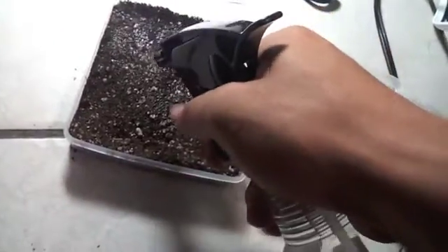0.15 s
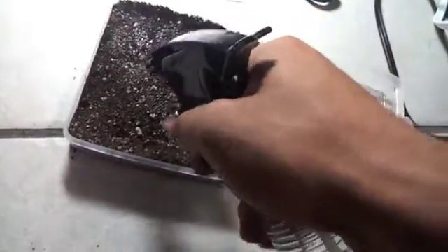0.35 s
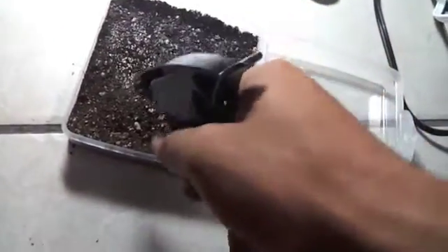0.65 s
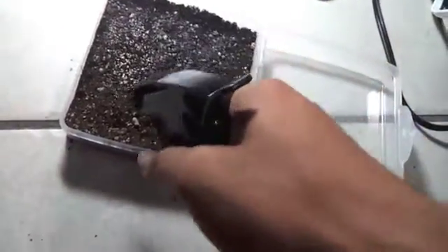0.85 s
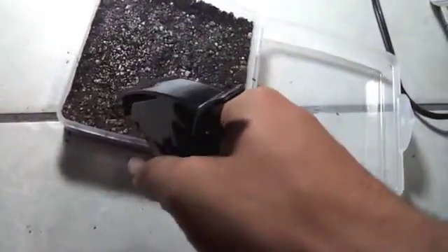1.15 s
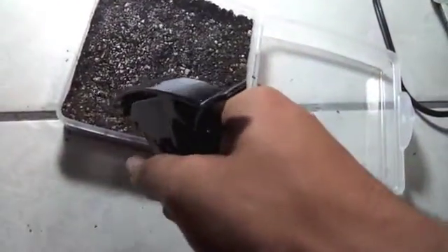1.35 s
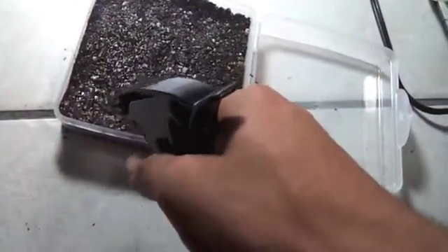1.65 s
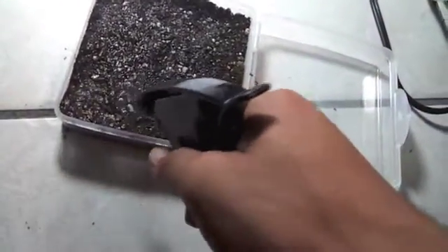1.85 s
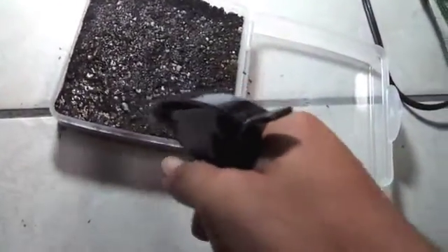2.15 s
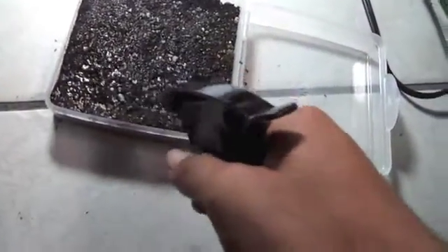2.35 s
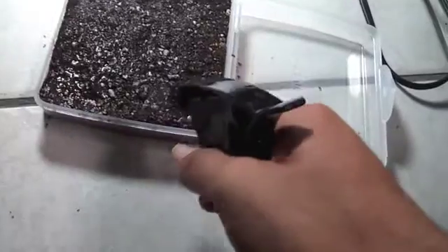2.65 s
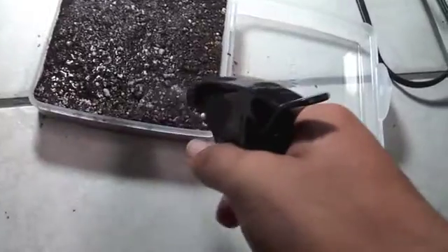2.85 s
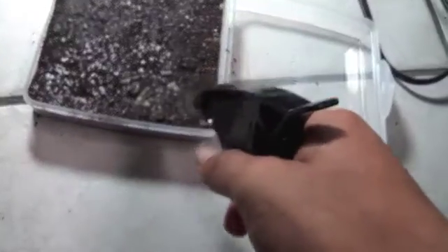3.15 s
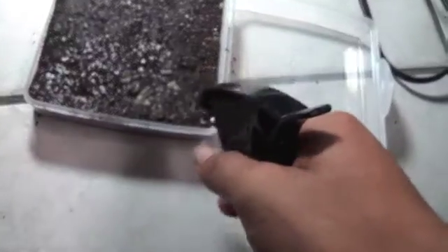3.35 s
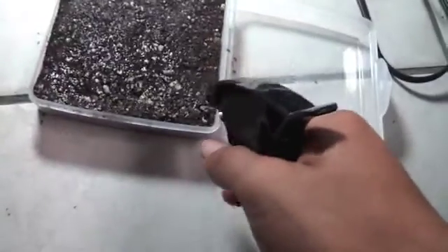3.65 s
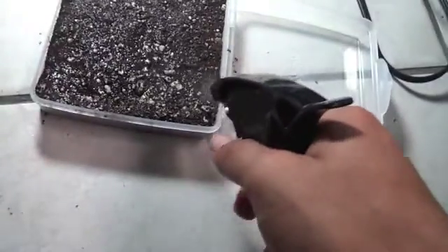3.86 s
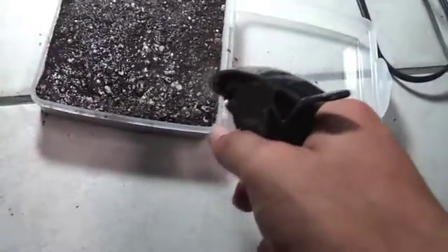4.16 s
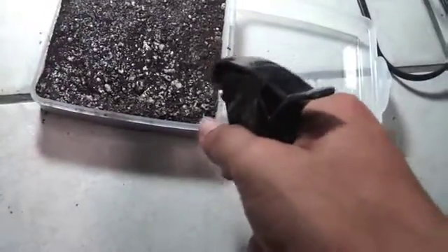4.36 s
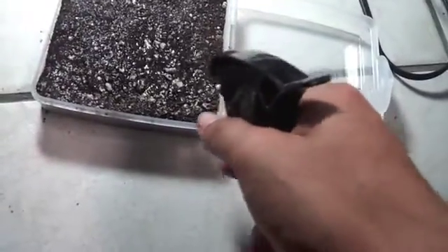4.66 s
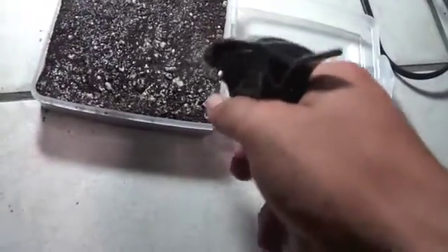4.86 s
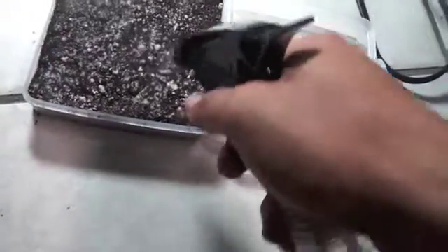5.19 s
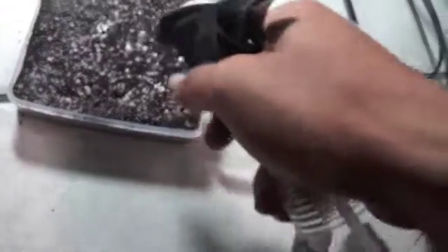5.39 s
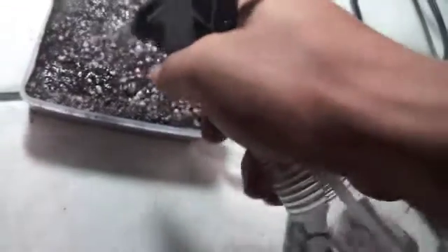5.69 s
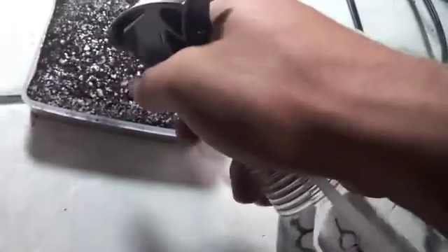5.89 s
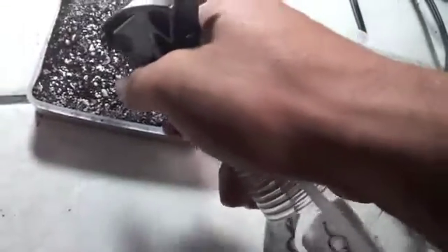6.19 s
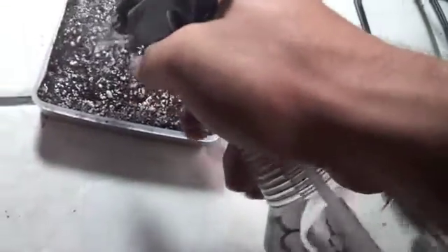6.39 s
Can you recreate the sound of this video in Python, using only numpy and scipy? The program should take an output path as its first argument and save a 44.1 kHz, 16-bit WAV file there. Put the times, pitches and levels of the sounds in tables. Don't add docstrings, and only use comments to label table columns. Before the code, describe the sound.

Close up in a small room, a hand pumps a plastic trigger spray bottle about three times a second. Each squeeze begins with a sharp, juddering plastic crack, then a short airy hiss of mist swells and fades. On release, small ticks and a faint sucking whistle follow. Low room noise and a weak hum lie underneath; the loudest clicks sound slightly overloaded.

```python
import sys
import numpy as np
from scipy import signal
from scipy.io import wavfile

SR = 44100
rng = np.random.default_rng(int(sys.argv[2]) if len(sys.argv) > 2 else 0)


def boost(x):
    u = np.asarray(x, float) / 20
    return 10 ** u


def master_out(mix):
    frames = np.transpose(np.atleast_2d(mix))
    ceiling = np.clip(frames, -1, 1)
    pcm = np.round(ceiling * 32767).astype(np.int16)
    wavfile.write(sys.argv[1], SR, pcm)


N = 287973

# f/Hz, bandwidth/Hz, level/dB
SHELL_MODES = [(2285, 400, -7), (2720, 210, -8), (3153, 260, -2.5), (3556, 405, -1.5), (4085, 530, -1),
               (4810, 415, -1.5), (5350, 565, 2), (5960, 580, 3), (6314, 700, 0)]
# f/Hz, bandwidth/Hz, level/dB
HEAD_MODES = [(813, 84, -2), (992, 118, 0.5), (1234, 89, -2), (1650, 320, -7)]
# f/Hz, bandwidth/Hz, level/dB
BOTTLE_MODES = [(234.7, 59.5, -2), (348, 72, 0), (510, 420, -13.5)]
# f/Hz, bandwidth/Hz, level/dB
INLET_MODES = [(1970, 330, -8), (2360, 210, -3), (2670, 190, -10.5)]
# t/s, peak level/dB, brightness/dB
FIRST_SLIPS = [(0.21, -8, -5), (0.5001, -10, -7), (0.7676, -12, -4), (1.0721, -14, -1), (1.3562, -14, 2),
               (1.615, -16, -1), (1.9145, -18, -2), (2.2385, -15, -3), (2.5318, -18, 0), (2.8538, -18, -6),
               (3.1885, -14, 4), (3.5446, -7, -3), (3.8923, -15, 0), (4.199, -21, 3), (4.5634, -7, -2),
               (4.9423, -16, 1), (5.3208, -11, -3), (5.6972, -8, -2), (6.0708, -14, -2), (6.4481, -12, -3)]
# start t/s, stop t/s, level/dB
INTAKES = [(0.116, 0.144, -66), (0.417, 0.45, -53), (0.706, 0.74, -52), (0.976, 1.03, -55),
           (1.287, 1.323, -52), (1.565, 1.589, -45), (1.85, 1.895, -53), (2.14, 2.201, -50),
           (2.465, 2.512, -54.5), (2.766, 2.808, -51), (3.094, 3.15, -38), (3.449, 3.475, -48),
           (3.793, 3.842, -51), (4.135, 4.19, -51), (4.47, 4.539, -54), (4.814, 4.911, -57),
           (5.196, 5.292, -52), (5.606, 5.64, -44.5), (5.937, 6.003, -47.5), (6.342, 6.395, -44)]


def rms_one(x):
    return x / np.sqrt(np.mean(x ** 2) + 1e-20)


def drift(rate):
    r = np.exp(-2 * np.pi * rate / SR)
    noise = rng.standard_normal(N + 9000)
    return rms_one(signal.lfilter([1], [1, -2 * r, r * r], noise)[9000:])


def resonance(x, hz, width_hz):
    r = np.exp(-np.pi * width_hz / SR)
    zeros = np.array([1, 0, -1]) * (1 - r * r) / 2
    poles = [1, -2 * r * np.cos(2 * np.pi * hz / SR), r * r]
    return signal.lfilter(zeros, poles, x)


def grains(per_s, spread_db):
    sizes = boost(spread_db * np.minimum(rng.exponential(1, N), 5)) * rng.choice([-1, 1], N)
    return rms_one(sizes * (rng.random(N) < per_s / SR))


def hiss(modes, drive, patchy_db, rate):
    total = np.zeros(N)
    for k, (hz, width, db) in enumerate(modes):
        flicker = boost(db + patchy_db * drift(rate))
        total += (-1) ** k * flicker * resonance(drive, hz, width)
    return rms_one(total)


def struck(events, modes, scrub_s, scrub_db, vary_db):
    rows, span = np.array(events, float), 1400
    brightness = rows[:, 2] if rows.shape[1] > 2 else np.zeros(len(rows))
    luck = rng.standard_normal((len(rows), len(modes)))
    decay = np.exp(-np.arange(span) / (scrub_s * SR))
    drive = boost(scrub_db) * rng.standard_normal((len(rows), span)) * decay
    drive[:, 0] = 1
    hits = np.zeros((len(rows), span))
    for k, (hz, width, db) in enumerate(modes):
        tilt_db = brightness * np.tanh((hz - 4400) / 500) / 2
        gain = boost(db + vary_db * luck[:, k] + tilt_db)
        hits += (-1) ** k * resonance(drive, hz, width) / width * gain[:, None]
    hits *= (boost(rows[:, 1]) / np.abs(hits).max(axis=1))[:, None]
    out = np.zeros(N + span)
    first = ((rows[:, :1] - .0004) * SR).astype(int)
    np.add.at(out, first + np.arange(span), hits)
    return out[:N]


def lingering(level, t60):
    fall = 60 / t60 * np.arange(N) / SR
    return boost(np.maximum.accumulate(20 * np.log10(level + 1e-9) + fall) - fall)


def hum():
    hum_hz, hum_db = 116.6, -83.5
    level = boost(hum_db + 6.5 + 2.0 * drift(9.2))
    return level * np.sin(2 * np.pi * hum_hz * np.arange(N) / SR)


def room_noise(jet):
    # f/Hz, bandwidth/Hz, level/dB
    room_modes = [(244, 120, -1), (550, 157, -1), (835, 415, 1.5), (1510, 530, -4.5)]
    level = boost(-63.5) + boost(-36.5) * lingering(jet, t60=0.43)
    level = level + boost(-24.5) * lingering(rasp_levels()[0], t60=0.46)
    return level * hiss(room_modes, rng.standard_normal(N), patchy_db=3.5, rate=17)


def dribble(jet):
    # f/Hz, bandwidth/Hz, level/dB
    drop_modes = [(1980, 500, -2.5), (2980, 1100, -1), (4530, 1440, 3.5), (6200, 1840, 1),
                  (6630, 800, -5.5)]
    level = boost(-56.0) + boost(-19.5) * lingering(jet, t60=0.27)
    return level * hiss(drop_modes, grains(8000, 3.1), patchy_db=4.0, rate=15)


def rest():
    fall_db_per_s, deepest_db = 170.0, -10.0
    t, db = np.arange(N) / SR, np.zeros(N)
    for (_, home, _), (pull, *_) in zip(INTAKES, FIRST_SLIPS):
        db -= fall_db_per_s * (t - home) * (t > home) * (t < pull)
    return boost(np.maximum(db, deepest_db))


def gurgle():
    # start t/s, stop t/s, first f/Hz, last f/Hz, level/dB
    notes_sung = [
        (1.266, 1.55, 693, 663, -54),
        (1.322, 1.345, 680, 674, -40),
        (1.388, 1.44, 678, 672, -45),
        (4.518, 4.61, 560, 550, -58),
        (4.675, 4.784, 600, 628, -56),
    ]
    edge_s, overtone_db = .009, -24.0
    t, out = np.arange(N) / SR, np.zeros(N)
    waver = 1 + .01 * drift(30)
    flutter = boost(2.5 * drift(30) + 3.0 * drift(90))
    for start, stop, from_hz, to_hz, db in notes_sung:
        shape = np.interp(t, [start - edge_s, start, stop, stop + edge_s], [0, 1, .4, 0])
        on = shape > 0
        pitch_hz = np.interp(t, [start, stop], [from_hz, to_hz]) * waver
        phase = 2 * np.pi * np.cumsum(pitch_hz[on]) / SR
        out[on] += boost(db) * shape[on] * (np.sin(phase) + boost(overtone_db) * np.sin(2 * phase))
    return out * flutter


def slosh():
    # start t/s, loudest t/s, stop t/s, level/dB
    wash = (.32, .375, .485, -51.0)
    # f/Hz, bandwidth/Hz, level/dB
    air_modes = [(585, 60, 0), (850, 200, -8), (1210, 110, -5)]
    start, loudest, stop, db = wash
    shape = np.interp(np.arange(N) / SR, [start, loudest, stop, stop + 0.015], [0.1, 1, 0.36, 0.055])
    return boost(db) * shape * hiss(air_modes, rng.standard_normal(N), patchy_db=2.0, rate=25)


def background(jet):
    return (dribble(jet) + room_noise(jet)) * rest() + gurgle() + slosh() + hum()


def suction():
    t, level = np.arange(N) / SR, np.zeros(N)
    for start, stop, db in INTAKES:
        times = [start - .006, start, stop, stop + 0.0044]
        level += boost(db) * np.interp(t, times, [0.009, 0.37, 0.49, 0])
    return level * hiss(INLET_MODES, grains(5000, 2.6), patchy_db=4.5, rate=9.7)


def pressure():
    # valve opens t/s, full pressure t/s, faded t/s, level/dB
    mists = [(-0.06, -0.011, 0.08, -32), (0.231, 0.301, 0.37, -33.5), (0.527, 0.591, 0.66, -32.5),
             (0.807, 0.866, 0.946, -32.5), (1.105, 1.14, 1.255, -34.5), (1.384, 1.445, 1.519, -33),
             (1.661, 1.732, 1.817, -30.5), (1.961, 2.038, 2.108, -29), (2.273, 2.338, 2.418, -29),
             (2.577, 2.646, 2.727, -31), (2.887, 2.977, 3.033, -29), (3.222, 3.283, 3.41, -30),
             (3.572, 3.648, 3.742, -31), (3.912, 3.99, 4.1, -30.5), (4.249, 4.325, 4.413, -28.5),
             (4.599, 4.664, 4.785, -29), (4.977, 5.063, 5.158, -27.5), (5.356, 5.434, 5.546, -27.5),
             (5.713, 5.82, 5.896, -27.5), (6.096, 6.18, 6.31, -29), (6.446, 6.477, 6.66, -28)]
    t, jet = np.arange(N) / SR, np.zeros(N)
    for opens, full, faded, db in mists:
        rise = np.clip((full - t) / (full - opens + 0.018), 0, 3)
        fall = np.clip((t - full) / (faded - full), 0, 9)
        lifted = np.clip((t - opens) / 0.022, 0, 1)
        jet += boost(db - 21.8 * rise ** 2.16 - 16.9 * fall ** 1.87) * lifted
    return jet


def spray(jet):
    # f/Hz, bandwidth/Hz, level/dB
    jet_modes = [(3130, 500, -7.5), (3910, 660, -4.5), (4360, 776, -2.5), (5605, 1110, 1),
                 (6506, 1230, -3.5)]
    # f/Hz, bandwidth/Hz, level/dB
    nozzle_modes = [(890, 198, -8.5), (1528, 480, -6), (2097, 370, 0.5), (2856, 220, -2)]
    mist = (grains(14000, 1.6) + 0.78 * rng.standard_normal(N)) * boost(0.25 * drift(60))
    outside = hiss(jet_modes, mist, patchy_db=1.5, rate=6.7)
    inside = hiss(nozzle_modes, mist, patchy_db=0.5, rate=7.4)
    return jet * (outside + boost(-6.0) * inside)


def catches():
    # t/s, peak level/dB
    let_go = [(.124, -37), (.4127, -35), (.7037, -37), (.9848, -37), (1.271, -33), (1.5592, -34),
              (1.8552, -40), (2.1578, -35), (2.4672, -33), (2.771, -34), (3.0909, -38), (3.4374, -35),
              (3.7932, -35), (4.1331, -36), (4.4625, -35), (4.8261, -31), (5.214, -35), (5.6033, -32),
              (5.9459, -39), (6.3379, -34)]
    # t/s, peak level/dB
    slack = [(.1979, -35), (.2032, -36), (.4386, -34), (.719, -31), (.7403, -36), (1.3166, -36),
             (1.5645, -33), (1.8716, -32), (2.7833, -31), (3.1443, -32), (3.47, -34), (3.527, -39),
             (3.7971, -33), (3.8285, -31), (3.842, -31), (3.8582, -34), (4.1381, -31), (4.1832, -35),
             (4.52, -31), (4.5322, -35), (4.8313, -33), (4.8406, -31), (4.8725, -33), (4.9057, -32),
             (5.2827, -36), (5.6172, -31), (5.9584, -31), (5.9721, -32), (5.9911, -37), (6.352, -31)]
    gap_s, catch_db, spread_db = .013, -38.0, 2.0
    rows, luck = let_go + slack, rng.random((len(INTAKES), 2, 10))
    for (start, _), (_, stop, _), (gaps, sizes) in zip(let_go, INTAKES, luck):
        s = start + gap_s * np.cumsum(.4 + 1.2 * gaps)
        db = catch_db + spread_db * (3.5 * sizes - 1.75)
        rows = rows + list(zip(s, np.where(s < stop, db, -140)))
    return rows


def return_ticks():
    # t/s, peak level/dB
    hard_ticks = [(0.1414, -30), (0.4248, -28), (1.0001, -29), (1.2813, -26), (1.2884, -25), (1.3386, -24),
                  (1.5715, -30), (2.1761, -28), (2.4786, -26), (2.4925, -28), (2.7783, -29), (2.7907, -28),
                  (3.1054, -24), (3.1269, -27), (3.1624, -19), (3.4522, -27), (3.8069, -26), (3.8355, -27),
                  (3.8659, -18), (4.1469, -28), (4.4781, -24), (4.5099, -30), (4.851, -21), (4.8657, -28),
                  (4.8861, -27), (5.229, -27), (5.2659, -30), (6.3716, -27), (6.3822, -26), (6.3908, -29)]
    # t/s, peak level/dB, brightness/dB
    valve_snaps = [(1.1144, -25, 10), (1.9815, -21, 14), (2.9184, -17, 18), (3.216, -31, 14),
                   (4.2553, -29, 10), (4.7678, -30, 8), (5.5332, -32, 10)]
    ticks = [(s, db, -2.5) for s, db in hard_ticks] + valve_snaps
    out = struck(ticks, SHELL_MODES, scrub_s=.0022, scrub_db=-17, vary_db=2.2)
    out += struck(catches(), SHELL_MODES, scrub_s=.002, scrub_db=-19, vary_db=2.5)
    return boost(-.8) * out


def knocks():
    # t/s, peak level/dB
    impacts = [(1.338, -33), (3.117, -34), (3.865, -41), (4.85, -43), (5.654, -33), (5.659, -36),
               (6.369, -35)]
    modes = BOTTLE_MODES[1:] + HEAD_MODES[1:] + INLET_MODES[:1]
    return boost(-5.5) * struck(impacts, modes, scrub_s=0.0076, scrub_db=-11, vary_db=2.0)


def rasp_levels():
    # start t/s, stop t/s, level/dB, head re shell level/dB, bottle re shell level/dB
    rasps = [(0.209, 0.234, -26, -2.5, -5), (0.504, 0.517, -24, -6.5, -14), (1.082, 1.11, -23, -6.5, -19),
             (1.362, 1.387, -24, -4, -7.5), (1.634, 1.645, -26, -25, -13), (1.925, 1.939, -34, -7, -13.5),
             (2.533, 2.548, -37.5, -8, -23), (2.854, 2.866, -33, -3.5, -25),
             (3.191, 3.205, -23.5, -15, -14.5), (3.564, 3.59, -19.5, -4, -11.5), (3.9, 3.91, -29, -4.5, -5),
             (4.219, 4.233, -23, -5.5, -10), (4.577, 4.581, -27.5, -23, -24), (5.33, 5.358, -20, -3.5, -15),
             (5.707, 5.718, -21, -6.5, -10), (6.08, 6.102, -23, -4.5, -14.5), (6.479, 6.514, -22, 0, -7)]
    t, levels = np.arange(N) / SR, np.zeros((3, N))
    for start, stop, db, head_db, bottle_db in rasps:
        times = [start, start + 0.0022, max(stop - .003, start + .002), max(stop + .004, start + .003)]
        levels[0] += boost(db) * np.interp(t, times, [0, 1.0, 0.68, 0.00011])
        low_shake = np.interp(t, times, [0.00047, 0.6, 0.74, 0.00045])
        levels[1:] += boost([[db + head_db], [db + bottle_db]]) * low_shake
    return levels


def judder():
    rasp = grains(10000, 1.8) * boost(1.0 * drift(200))
    out = np.zeros(N)
    for level, modes in zip(rasp_levels(), (SHELL_MODES, HEAD_MODES, BOTTLE_MODES)):
        out += level * hiss(modes, rasp, patchy_db=.8, rate=40)
    return out


def break_away():
    # t/s, peak level/dB, brightness/dB
    later_slips = [(0.2173, -11, 1), (0.227, -13, 5), (0.5108, -14, 4), (1.0804, -9, 0), (1.0926, -7, 12),
                   (1.0975, -9, 9), (1.3651, -10, 3), (1.6302, -17, 0), (1.9271, -22, 0), (2.5412, -21, 6),
                   (2.8591, -16, 0), (3.1992, -14, 6), (3.5537, -9, 3), (3.5613, -7, 11), (3.5672, -8, 10),
                   (3.9001, -10, 0), (3.905, -9, 7), (4.216, -13, 0), (4.947, -20, 0), (5.3303, -11, 4),
                   (5.3436, -8, 0), (5.7039, -12, 3), (6.0807, -10, -1), (6.0925, -12, 0), (6.4586, -10, 3),
                   (6.468, -10, 3), (6.4771, -11, 7), (6.4854, -9, 7), (6.4935, -10, 3), (6.502, -8, 0)]
    grip = [(s, db - 6.1) for s, db, _ in FIRST_SLIPS] + [(s, db) for s, db, _ in later_slips]
    out = boost(-.6) * struck(FIRST_SLIPS + later_slips, SHELL_MODES, scrub_s=.0025, scrub_db=-17, vary_db=2.2)
    out += boost(-16.5) * struck(grip, HEAD_MODES, scrub_s=0.0054, scrub_db=-22.5, vary_db=6.5)
    out += boost(-21) * struck(grip, BOTTLE_MODES, scrub_s=0.004, scrub_db=-18.0, vary_db=2.5)
    return out


def nearby(x, t60, level_db):
    t = np.arange(SR // 4) / SR
    tail = rng.standard_normal(len(t)) * boost(-60 * t / t60) * np.clip(t / 0.0028, 0, 1)
    return boost(level_db) * signal.fftconvolve(x, tail / np.sqrt(np.sum(tail ** 2)))[:N]


def scene():
    jet = pressure()
    trigger = return_ticks() + knocks() + judder() + break_away()
    reflected = nearby(trigger, t60=0.18, level_db=-14.5)
    return (background(jet) + suction() + spray(jet) + trigger + reflected)[None]


def roll_off(x):
    return signal.sosfilt(signal.butter(12, 9700, fs=SR, output="sos"), x)


def record(dry):
    x = signal.sosfilt(signal.butter(6, 105, "high", fs=SR, output="sos"), dry)
    x = .8 * np.tanh(x / .8)
    strain = np.maximum(np.abs(x) - .14, 0)
    x = x + 0.4 * signal.sosfilt(signal.butter(1, [15, 150], "band", fs=SR, output="sos"), strain)
    top_hz = 7830
    x = signal.sosfilt(signal.cheby2(10, 60, top_hz + 700, fs=SR, output="sos"), x)
    mirror = x * np.cos(2 * np.pi * 15000 * np.arange(N) / SR)
    image = signal.sosfilt(signal.butter(4, [8300, 9400], "band", fs=SR, output="sos"), mirror)
    x = x + boost(-41 + 4.3 * drift(24)) * image
    return roll_off(x)


dry = scene()
out = record(dry)
master_out(out)
```